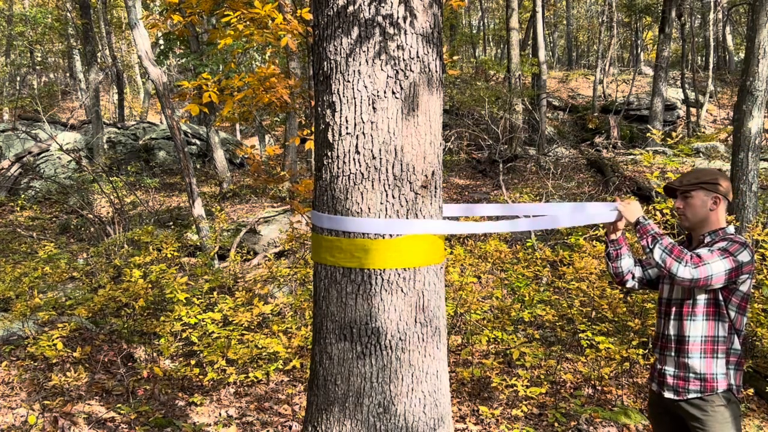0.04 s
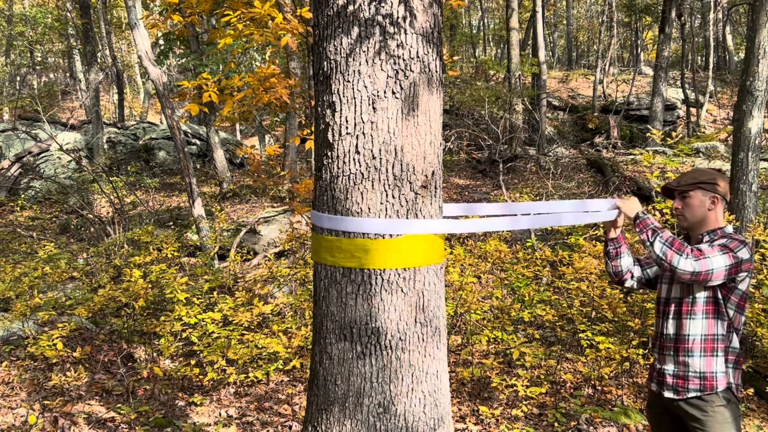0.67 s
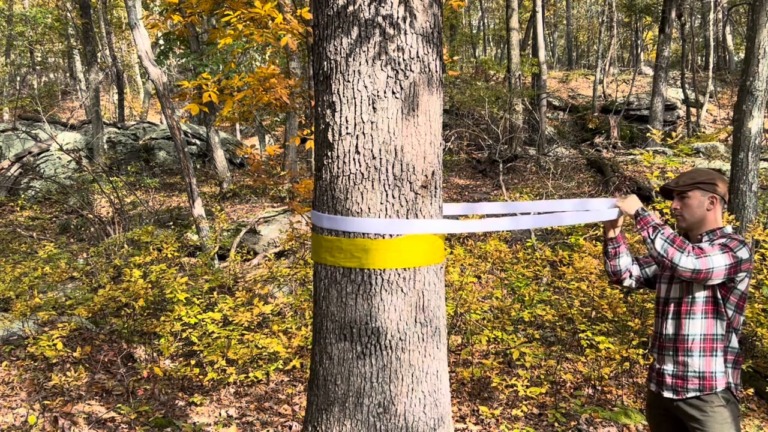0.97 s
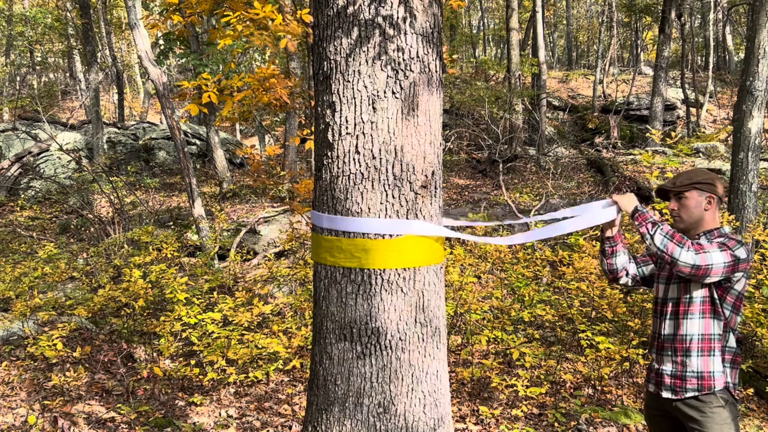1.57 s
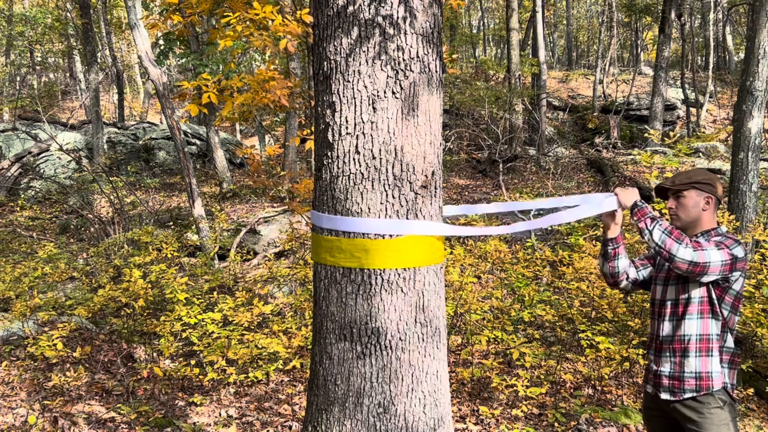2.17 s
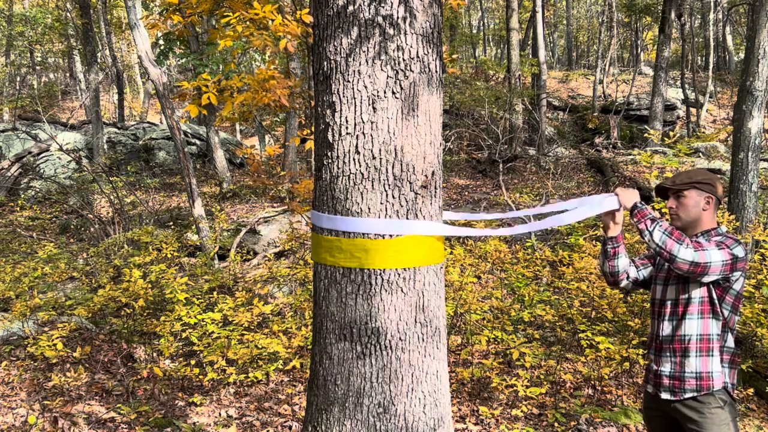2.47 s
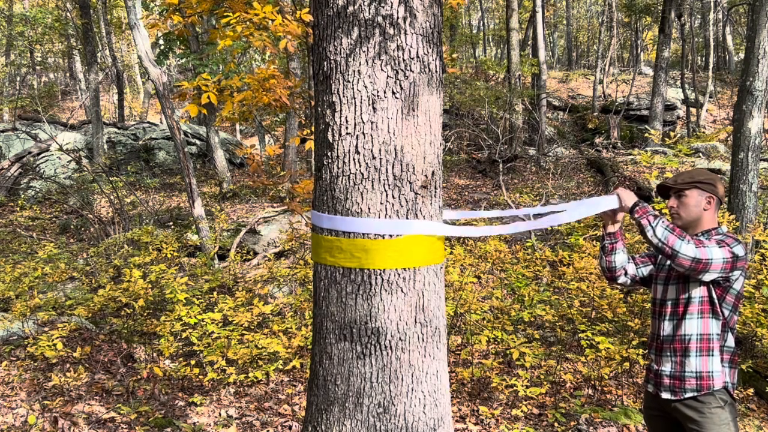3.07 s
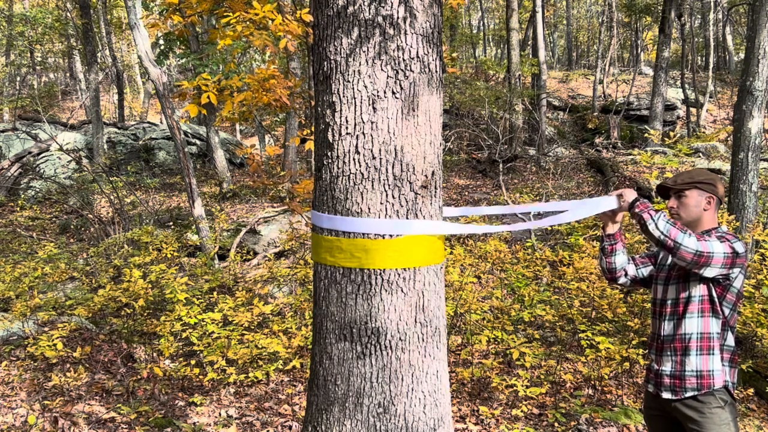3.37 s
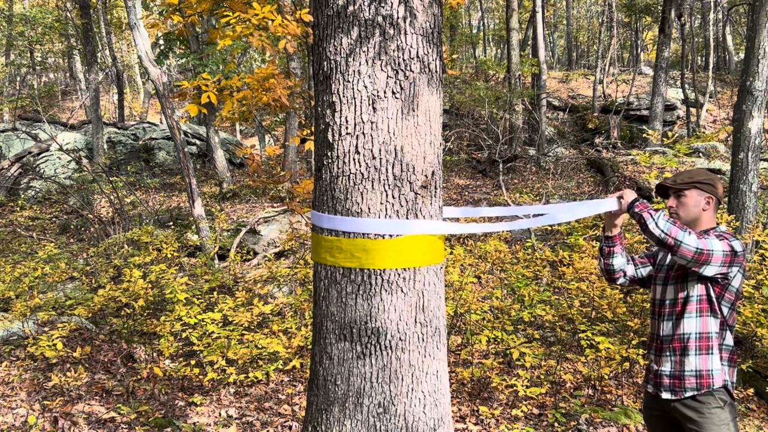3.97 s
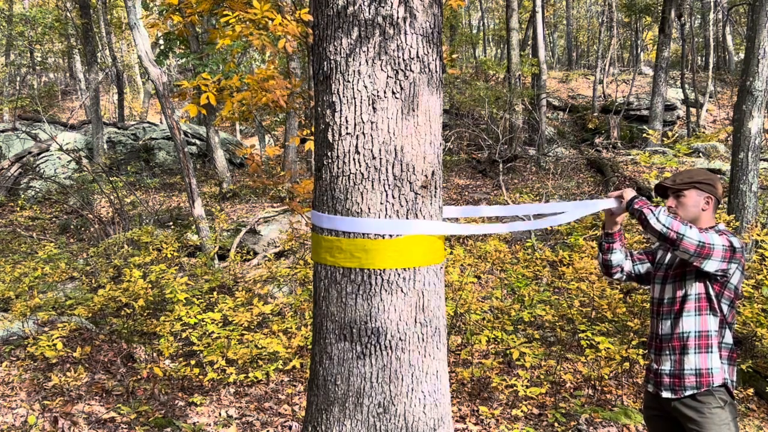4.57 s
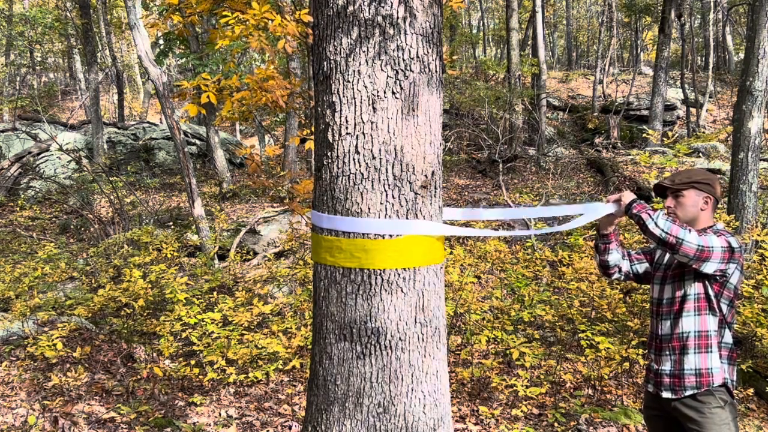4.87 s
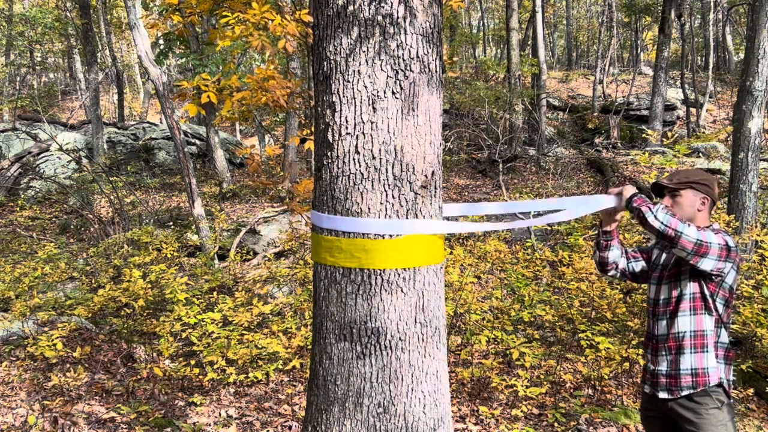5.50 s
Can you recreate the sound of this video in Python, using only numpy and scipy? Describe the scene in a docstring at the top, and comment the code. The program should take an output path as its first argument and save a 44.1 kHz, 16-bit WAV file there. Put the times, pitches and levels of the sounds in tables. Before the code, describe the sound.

Short, scratchy crackles come from a hook-and-loop strap being pulled around a tree, faint and scattered at first, then more frequent and sharper. The strap briefly swishes through a buckle, a soft low bump follows, and the tugging resumes. The strap sits in the middle, fairly quiet, while a far engine's low drone carries on slightly to the left, with a light woodland breeze and barely audible crickets.

```python
"""A far engine drones in a quiet wood, slowly sinking in pitch, over a breeze and faint crickets.
From the first moments a hook-and-loop strap is fed through its buckle and tugged round a tree trunk.
Each tug tears a few hooks free in a short rasp; between tugs the webbing rubs on itself.
After three seconds the tugs come faster and louder. Around five seconds the webbing slides through
the buckle with a high swish, then comes a dull thud and a last run of tugs."""
import sys
import numpy as np
from scipy import signal
from scipy.fft import rfft, irfft, next_fast_len
from scipy.io import wavfile

SR = 44100
rng = np.random.default_rng(int(sys.argv[2]) if len(sys.argv) > 2 else 0)


def transcribe(signal):
    """Save signal, clipped to [-1, 1], as a 16-bit WAV file at the path in sys.argv[1]."""
    frames = np.atleast_2d(signal).T
    limited = np.clip(frames, -1, 1)
    pcm = np.round(limited * 32767).astype(np.int16)
    wavfile.write(sys.argv[1], SR, pcm)


N = 253134
TIME = np.arange(N) / SR


def from_db(db):
    """Turn decibels into a number to multiply a sound by."""
    return 10 ** (np.asarray(db) / 20)


def rms_one(x):
    """Scale a signal so that its average strength (rms) is 1."""
    return x / np.sqrt(np.mean(x ** 2) + 1e-20)


def in_time(rows):
    """Join a table's points with straight lines: one curve for each column after the time."""
    times, *columns = np.transpose(rows)
    return [np.interp(TIME, times, column) for column in columns]


def at_hz(rows, hz):
    """Read a table between its pitches, giving every octave the same room."""
    pitches, values = np.transpose(rows)
    return np.interp(np.log(hz + 1e-3), np.log(pitches), values)


def drift(per_s):
    """A random wobble of size 1 that changes about per_s times a second."""
    points = rng.standard_normal(int(2 * per_s * N / SR) + 3)
    return rms_one(np.interp(2 * per_s * TIME, np.arange(len(points)), points))


def band(x, low_hz, high_hz):
    """Keep the part of a sound between two pitches."""
    edges = [low_hz, min(high_hz, SR / 2 - 1)]
    return signal.sosfilt(signal.butter(2, edges, "band", fs=SR, output="sos"), x)


def noise(tone, likeness):
    """Stereo noise of strength 1, shaped by a tone table; likeness 1 makes left and right the same."""
    hz = np.arange(N // 2 + 1) * SR / N
    shared, opposite = rfft(rng.standard_normal((2, N))) * from_db(at_hz(tone, hz))
    alike = np.clip(at_hz(likeness, hz), -1, 1)
    spectrum = np.sqrt(1 + alike) * shared + np.sqrt(1 - alike) * opposite * [[1], [-1]]
    return rms_one(irfft(spectrum, N))


# The tone of moving air, strongest in the bass: pitch_hz, relative_db
AIR_TONE = [(18, -14), (35, -1.5), (62, 3.5), (92, -2), (145, -0.5), (192, -9.5), (260, -8), (330, -17),
            (520, -19.5), (750, -26.5), (1200, -36), (2800, -40), (6000, -47.5), (15000, -72.5)]
# How alike distant sound is on the left and right: pitch_hz, likeness (0 to 1)
AIR_LIKENESS = [(60, 0.94), (200, 0.71), (350, 0.78), (700, 0.18), (1500, 0.95), (4000, 1), (12000, 0.8)]
# How the hiss of the leaves rises and falls: time_s, change_db
LEAF_SWELL = [(0, 3), (.35, 1), (.7, -0.5), (1.2, -0.5), (2.0, 1), (2.7, 0), (3.5, 1), (4.5, -1), (5.1, 0),
              (5.74, 2.5)]


def breeze(air_db=-54, leaves_above_hz=330):
    """Moving air makes a steady low rumble and, above it, a leaf hiss that follows the breeze."""
    swell_db, = in_time(LEAF_SWELL)
    air = from_db(air_db) * noise(AIR_TONE, AIR_LIKENESS)
    rumble = signal.sosfiltfilt(signal.butter(2, leaves_above_hz, fs=SR, output="sos"), air)
    leaves = air - rumble
    return rumble + from_db(swell_db) * leaves


# Single cricket trills: start_s, end_s, pitch_hz, level_db (before boost_db)
CRICKET_TRILLS = [(-.1, .53, 3690, -79), (0.244, 0.543, 3430, -78.5), (1.272, 1.52, 3780, -80.5),
                  (1.547, 2.058, 3610, -79.5), (1.965, 2.285, 3710, -74.5), (2.295, 2.798, 3770, -84),
                  (2.78, 3.12, 3486, -77), (3.125, 3.55, 3740, -79), (4.1, 4.523, 3640, -74.5),
                  (5.38, 5.6, 3470, -75)]
# The tone of the steady cricket chorus further off: pitch_hz, relative_db
CHORUS_TONE = [(2000, -37), (3000, -13.5), (3450, -1.5), (3750, -3.5), (4200, -8), (6000, -40.5)]


def crickets(half_width_hz=80, fade_s=0.15, throb=0.3, strokes_per_s=52, boost_db=0.9, chorus_db=-83.5):
    """A cricket's wings ring near one pitch and throb with each stroke; distance blurs the note."""
    trills = np.zeros(N)
    for start_s, end_s, pitch_hz, level_db in CRICKET_TRILLS:
        fade = np.clip(np.minimum(TIME - start_s, end_s - TIME) / fade_s + .5, 0, 1)
        strokes = 1 + throb * np.sin(2 * np.pi * strokes_per_s * TIME + drift(6))
        ring = band(rng.standard_normal(N), pitch_hz - half_width_hz, pitch_hz + half_width_hz)
        trills += from_db(level_db + boost_db) * fade * strokes * rms_one(ring)
    return trills + from_db(chorus_db) * noise(CHORUS_TONE, AIR_LIKENESS)


# The engine's slowly sinking note: time_s, pitch_hz
ENGINE_PITCH = [(0, 121.7), (.55, 120.6), (1.2, 119.7), (2.1, 119.8), (3.0, 119.0), (4.0, 118.4),
                (5.0, 118.1), (5.74, 117.6)]
# How loud that note is: time_s, level_db
ENGINE_LEVEL = [(0, -38.5), (.28, -39), (.5, -44), (.96, -40), (1.39, -40), (1.48, -38), (2.5, -36.5),
                (3.19, -38), (3.35, -35.8), (3.7, -34.5), (3.95, -37), (4.64, -38.5), (4.95, -38),
                (5.2, -36), (5.74, -37.5)]
# Its overtones, at 2, 3 and 4 times the pitch: time_s, octave_db, third_db, fourth_db
ENGINE_OVERTONES = [(0, -52.5, -71, -76), (.5, -59, -74, -84), (1.5, -53.5, -71.5, -86.5),
                    (2.1, -57, -73, -74), (2.9, -58.5, -79.5, -76), (3.7, -54.5, -79, -76),
                    (4.3, -54, -73, -88), (4.85, -58.5, -73.5, -77), (5.1, -53.5, -71, -77),
                    (5.74, -56.5, -67.5, -73.5)]


def far_engine(blur_per_s=11, waver_db=1.16, waver_per_s=5.0):
    """A nearly pure hum: its octave wavers, and the long way through the air blurs higher overtones."""
    pitch_hz, = in_time(ENGINE_PITCH)
    note_db, = in_time(ENGINE_LEVEL)
    octave_db, third_db, fourth_db = in_time(ENGINE_OVERTONES)
    phase = 2 * np.pi * np.cumsum(pitch_hz) / SR
    octave = from_db(octave_db + waver_db * drift(waver_per_s)) * np.sin(2 * phase)
    hum = np.sqrt(2) * (from_db(note_db) * np.sin(phase) + octave)
    for multiple, level_db in ((3, third_db), (4, fourth_db)):
        sine = drift(blur_per_s) * np.sin(multiple * phase)
        cosine = drift(blur_per_s) * np.cos(multiple * phase)
        hum += from_db(level_db) * (sine + cosine)
    return hum


def thud(middle_s=5.355, half_length_s=0.05, level_db=-46):
    """A soft, dull bump: deep noise that swells and dies away."""
    swell = np.exp(-((TIME - middle_s) / half_length_s) ** 2)
    return from_db(level_db) * swell * rms_one(band(rng.standard_normal(N), 35, 92))


# How hard the webbing rubs on itself: time_s, level_db
RUB_LEVEL = [(0, -70), (.1, -84), (1.15, -83), (1.45, -73), (1.7, -79.5), (1.96, -75.5), (2.4, -86),
             (3.12, -79.5), (3.22, -69.5), (3.6, -79.5), (3.95, -66), (4.36, -74.5), (4.7, -67),
             (5.0, -73.5), (5.28, -67.5), (5.43, -72.5), (5.63, -69), (5.7, -55)]
# The tone of that rubbing: pitch_hz, relative_db
RUB_TONE = [(700, 2), (1400, -3.5), (2400, 5), (3600, 1.5), (5000, 2), (7000, 1), (8500, -5), (10000, -9.5),
            (11700, -1), (14000, -4.5), (15700, -15)]
# The bright fizz of fibres and hook tips: pitch_hz, relative_db
FIZZ_TONE = [(4000, -21), (6800, -8), (8200, 0.5), (10000, -5.5), (11500, 2), (13200, -1), (15700, -6.5)]
# How alike the strap sounds on the left and right: pitch_hz, likeness (0 to 1)
STRAP_LIKENESS = [(800, 0.52), (1800, 1), (3500, 1), (6500, 1), (8500, 1), (14000, 1)]


def rubbing(catch_db=2.5, grain_db=1.0, crinkle_db=-7, puff_spread_db=9.0):
    """The weave catches unevenly as it moves, and stray fibres crinkle in brief, bright puffs."""
    level_db, = in_time(RUB_LEVEL)
    catches = rms_one(from_db(catch_db * drift(35) + grain_db * drift(500)))
    puffs = rms_one(from_db(puff_spread_db * np.minimum(drift(45), 2)))
    crinkle = from_db(crinkle_db) * puffs * noise(FIZZ_TONE, STRAP_LIKENESS)
    weave = catches * noise(RUB_TONE, STRAP_LIKENESS)
    return from_db(level_db) * (weave + crinkle)


# The tone of fast-sliding webbing: pitch_hz, relative_db
SWISH_TONE = [(2000, -16), (5500, -23.5), (7000, -8.5), (8200, 4.5), (9000, 1), (10000, -15), (11500, 1),
              (13000, -9.5), (15500, -14)]


def sliding(start_s=4.96, end_s=5.27, level_db=-61.5, fade_db_per_s=600, flutter_db=1.0):
    """The webbing slides through the buckle in a few even surges, making a high swish."""
    first_surge_s, surge_every_s, surge_db = 4.98, .083, 3
    surge = np.cos(2 * np.pi * (TIME - first_surge_s) / surge_every_s)
    outside_s = np.maximum(np.maximum(start_s - TIME, TIME - end_s), 0)
    swish_db = level_db + surge_db * surge - fade_db_per_s * outside_s
    same_both_sides = [(4000, 1.0), (13000, 1.0)]
    return from_db(swish_db + flutter_db * drift(73)) * noise(SWISH_TONE, same_both_sides)


def stray_tugs(count=64, per_s=4.5, above_rub_db=3.0, length_s=.006, middle_hz=2950):
    """Faint tugs come at random with the rubbing and follow its level; gives rows like those of TUGS."""
    wait, size, pitch = rng.random((count, 3)).T
    times = np.cumsum(2 * wait / per_s)
    levels = np.interp(times, *np.transpose(RUB_LEVEL)) + above_rub_db * 2 * size
    pitches = middle_hz * 2 ** ((pitch - .5) / 2)
    return [(time_s, length_s, hz, db, db - above_rub_db)
            for time_s, hz, db in zip(times, pitches, levels) if time_s < TIME[-1]]


def hook_snaps(per_s=6000, spread_db=2.5):
    """Single hooks let go at random, each with a tiny click of its own size."""
    sizes = from_db(spread_db * np.minimum(rng.exponential(1, N), 3))
    signs = rng.choice([-1, 1], N)
    lets_go = rng.random(N) < per_s / SR
    return rms_one(sizes * signs * lets_go)


# Tugs that tear hooks free: middle_s, length_s, pitch_hz, ring_db, treble_db
# (the two levels are starting points, which rasps() adjusts for each part of the sound)
TUGS = [(0.288, 0.036, 3200, -78, -78), (0.545, 0.0045, 3380, -63, -69.5), (0.552, 0.057, 3200, -81, -81.5),
        (1.006, .008, 3040, -71.5, -80), (1.4, .012, 3080, -57.5, -63.5), (1.475, .012, 4600, -67, -82),
        (1.574, 0.016, 3300, -71.5, -67.5), (1.805, 0.018, 2700, -66, -77.5), (1.918, .01, 2830, -80, -69),
        (1.975, 0.06, 3180, -81, -77.5), (2.176, 0.0053, 2600, -75, -73.5), (2.199, .01, 5800, -70, -84),
        (2.257, 0.016, 3080, -59, -65), (2.425, .007, 2720, -63.5, -77), (2.45, 0.016, 3450, -68, -73),
        (2.772, 0.0084, 3350, -85, -62.5), (2.951, 0.041, 3200, -70, -72.5),
        (3.151, 0.0051, 3530, -58, -62.5), (3.178, 0.0088, 3720, -73, -66),
        (3.235, 0.013, 2460, -55.5, -63), (3.266, .018, 3000, -67, -74), (3.369, 0.0076, 3200, -51.5, -61),
        (3.413, 0.004, 2700, -60, -88), (3.514, 0.0052, 2520, -59.5, -85), (3.75, 0.0043, 3100, -56, -66),
        (3.8, 0.0065, 2440, -52, -58.5), (3.821, 0.011, 2250, -61, -61.5), (3.88, .005, 3170, -51.5, -61.5),
        (3.917, 0.0068, 3400, -50.5, -63.5), (3.933, .011, 2980, -57, -62),
        (3.965, 0.0056, 2730, -49.5, -61), (3.978, 0.007, 2640, -51, -57),
        (4.036, 0.0085, 3200, -60, -63.5), (4.047, .0065, 2970, -58, -60),
        (4.083, 0.0047, 3740, -49, -57.5), (4.112, 0.019, 2420, -67, -78), (4.188, .014, 2100, -69, -81),
        (4.141, .007, 3900, -52.5, -61), (4.156, 0.0055, 3730, -49, -68), (4.168, .007, 3280, -52.5, -61.5),
        (4.255, 0.0043, 3420, -51, -68), (4.276, .0045, 3280, -47, -65), (4.308, 0.006, 3420, -51.5, -64),
        (4.42, .005, 3180, -46.5, -60.5), (4.539, 0.0049, 2850, -51.5, -60.5),
        (4.614, .007, 3020, -65, -62), (4.628, 0.012, 2800, -53, -57.5),
        (4.654, 0.0064, 2600, -51.5, -57.5), (4.704, 0.0079, 3020, -56.5, -62.5),
        (4.754, 0.0072, 5200, -61, -67), (4.782, .005, 5100, -59.5, -61.5), (4.804, .005, 3400, -57.5, -65),
        (4.866, 0.017, 2620, -62, -69.5), (4.975, 0.012, 2400, -62.5, -77), (5.075, 0.027, 2700, -61, -70),
        (5.175, 0.0069, 2460, -63, -77), (5.225, .006, 3360, -57, -60), (5.266, 0.0079, 3270, -53.5, -55.5),
        (5.292, 0.0061, 3020, -60.5, -67), (5.347, 0.0065, 3160, -84, -62),
        (5.52, 0.015, 3260, -55.5, -63.5), (5.571, 0.013, 3200, -56, -64.5),
        (5.655, .009, 3060, -48.5, -53.5), (5.675, 0.021, 2900, -57, -64),
        (5.703, 0.018, 2690, -53.5, -60.5), (5.72, 0.0091, 3550, -51, -51.5),
        (5.736, 0.011, 3210, -56, -58)]
# The tone of the scratching loops: pitch_hz, relative_db
SCRATCH_TONE = [(700, -7.5), (1400, -3.5), (2500, -1.5), (4500, 1.5), (6300, 1), (7500, -7), (10000, -17.5),
                (15000, -31)]


def rasps(half_width_hz=950, ring_trim_db=-1.5, crunch_db=-16, fizz_boost_db=3.5, grain_db=2.0):
    """A tug frees a crowd of hooks: the tight webbing rings, the loops scratch, the hook tips fizz."""
    early_share, late_share = 0.039, 0.15
    brush_s, brush_db, brush_follows = .022, -56.5, .3
    ringing, scratch_power, fizz_power = np.zeros((3, N))
    snaps, reach = hook_snaps(), SR // 8
    for middle_s, length_s, pitch_hz, ring_db, treble_db in TUGS + stray_tugs():
        middle = int(middle_s * SR)
        near = slice(max(middle - reach, 0), middle + reach)
        t = TIME[near] - middle_s
        half_lengths = 2 * t / length_s
        # most hooks go together, a few go early and more hang on
        stragglers = np.where(t < 0, early_share, late_share) ** 2 * np.exp(-np.abs(half_lengths) / 3)
        swell = np.sqrt(2 ** -(half_lengths ** 2) + stragglers)
        edges_hz = pitch_hz - half_width_hz, pitch_hz + half_width_hz
        ring = rms_one(band(band(snaps[near], *edges_hz), *edges_hz))
        # slack, low-pitched webbing also crunches underneath
        crunch = rms_one(band(snaps[near], 1330, 2050))
        ring += from_db(crunch_db) * (3000 / pitch_hz) ** 4 * crunch
        ring /= np.sqrt(np.average(ring ** 2, weights=swell ** 2))  # strength 1 during the tug
        ringing[near] += from_db(ring_db + ring_trim_db) * swell * ring
        # the loops scratch harder when the webbing rings strongly
        scratch_db = treble_db + 0.15 * (ring_db - treble_db)
        scratch_power[near] += (from_db(scratch_db) * swell) ** 2
        fizz_power[near] += (from_db(treble_db + fizz_boost_db) * swell) ** 2
        # the loops brush past each other just before and after the tug
        brush = from_db(brush_db + brush_follows * treble_db)
        fizz_power[near] += brush ** 2 * np.exp(-(t / brush_s) ** 2)
    scratch_grain = rms_one(from_db(grain_db * drift(900)))
    fizz_grain = rms_one(from_db(grain_db * drift(900)))
    scratch = np.sqrt(scratch_power) * scratch_grain * noise(SCRATCH_TONE, STRAP_LIKENESS)
    fizz = np.sqrt(fizz_power) * fizz_grain * noise(FIZZ_TONE, STRAP_LIKENESS)
    return ringing + scratch + fizz


# Echoes from the ground and nearby trunks: delay_s, relative_db
NEAR_ECHOES = [(.00403, -18.5), (.012, -21.5), (.019, -20)]


def wood_echoes(sound, tail_db=-22, tail_s=0.25):
    """Add a few near echoes and a thin tail of sound scattered by trunks and leaves."""
    mono = sound.mean(axis=0)
    echoes = sum(from_db(db) * np.interp(TIME - delay_s, TIME, mono, left=0)
                 for delay_s, db in NEAR_ECHOES)
    t = TIME[:SR // 2]
    tail = band(rng.standard_normal((2, len(t))), 650, 9000) * from_db(-60 * t / tail_s)
    tail /= np.sqrt(np.sum(tail ** 2) / 2)
    scattered = signal.fftconvolve(sound, tail, axes=1)[:, :N]
    return sound + band(echoes, 540, 5400) + from_db(tail_db) * scattered


def scene():
    """The strap and crickets in the middle; the engine, thud and breeze a little to the left."""
    strap = wood_echoes(rasps() + rubbing() + sliding())
    far = far_engine() + thud() + breeze()
    lean_left = from_db([[.8], [-.8]])
    return strap + crickets() + far * lean_left


# How far the wave at the left microphone opening runs ahead of the right: pitch_hz, lead_radians
LEFT_LEAD = [(1800, 0), (3200, .5), (4000, .45), (5000, .15), (7300, 0), (8200, -1.2), (10000, -3.14),
             (12000, -4.9), (13400, -6.3), (15500, -7.9)]


def record(dry, cutoff_hz=15600):
    """The two microphone openings fall out of step in the treble, and the very top is cut off."""
    size = next_fast_len(N + SR // 10)
    hz = np.arange(size // 2 + 1) * SR / size
    lead_radians = np.interp(hz, *np.transpose(LEFT_LEAD))
    left = irfft(rfft(dry[0], size) * np.exp(1j * lead_radians), size)[:N]
    top_cut = signal.ellip(10, .1, 80, cutoff_hz, fs=SR, output="sos")
    return signal.sosfilt(top_cut, [left, dry[1]])


dry = scene()
out = record(dry)
transcribe(out)
```